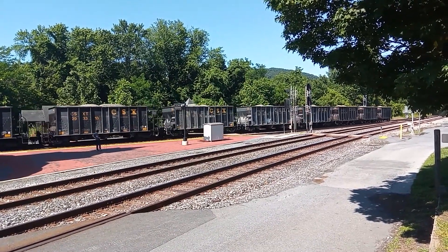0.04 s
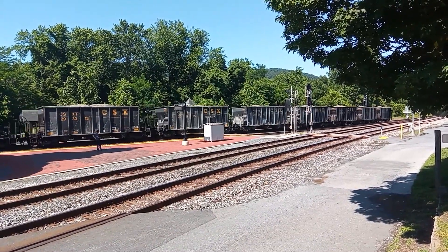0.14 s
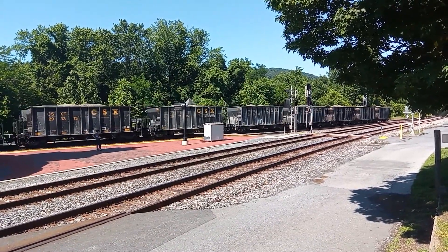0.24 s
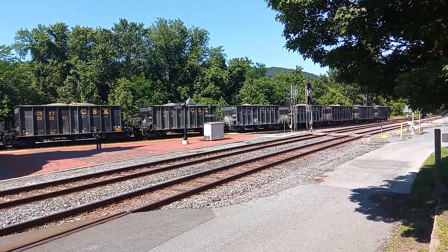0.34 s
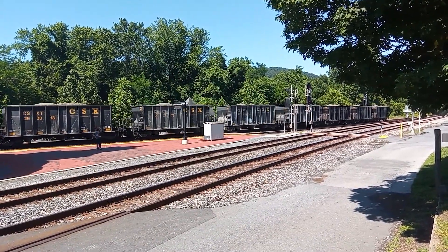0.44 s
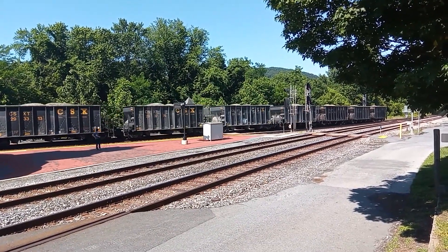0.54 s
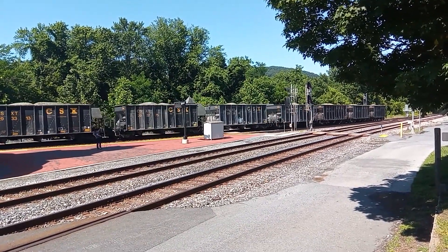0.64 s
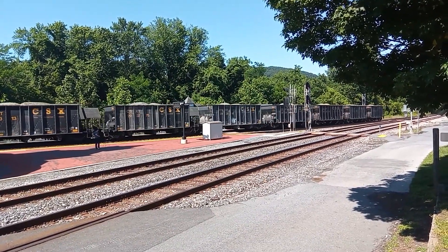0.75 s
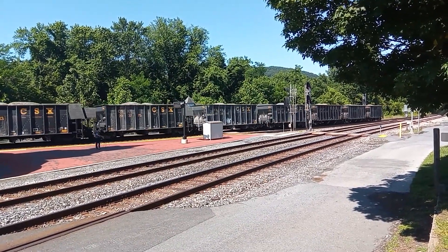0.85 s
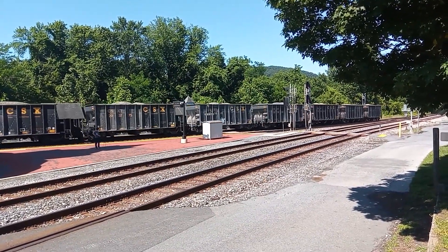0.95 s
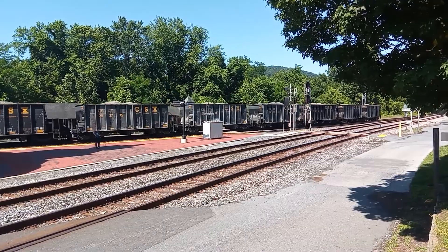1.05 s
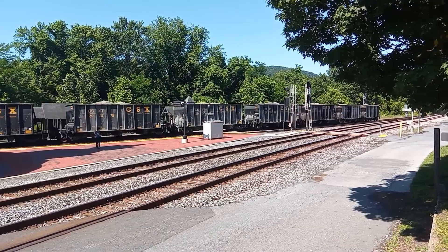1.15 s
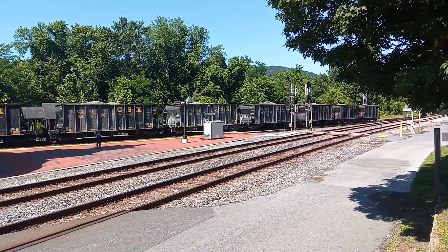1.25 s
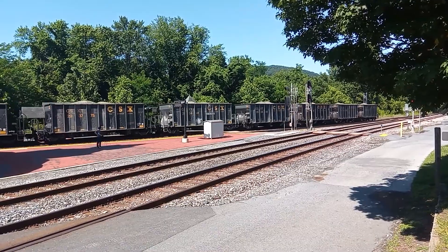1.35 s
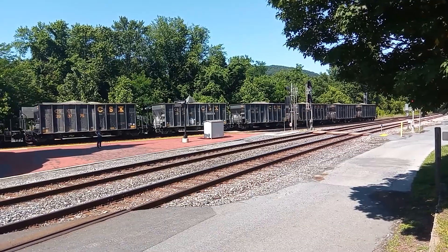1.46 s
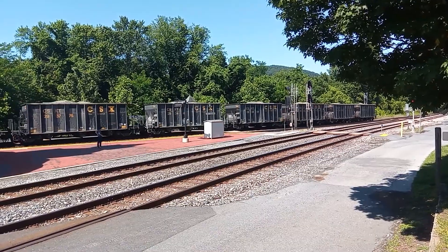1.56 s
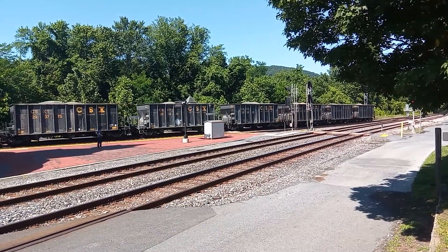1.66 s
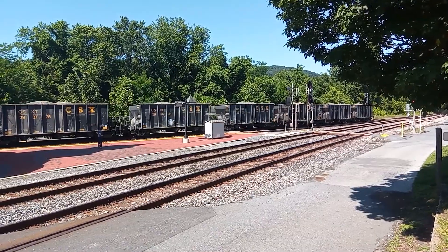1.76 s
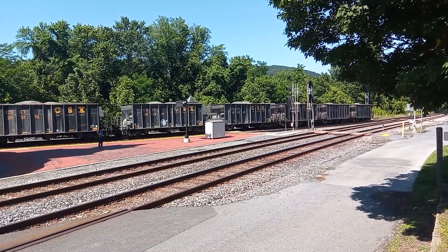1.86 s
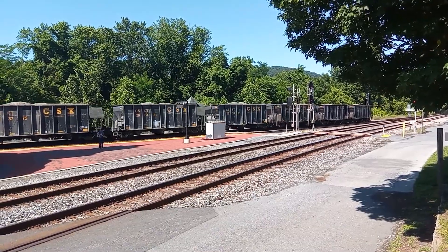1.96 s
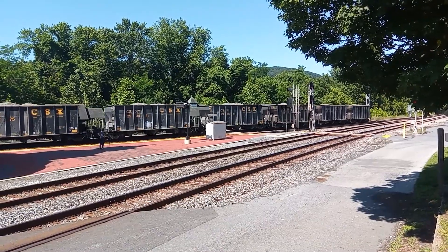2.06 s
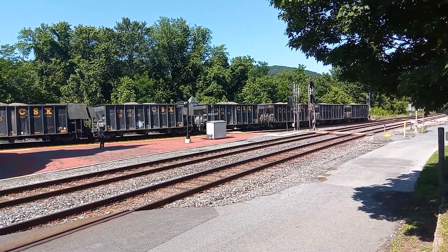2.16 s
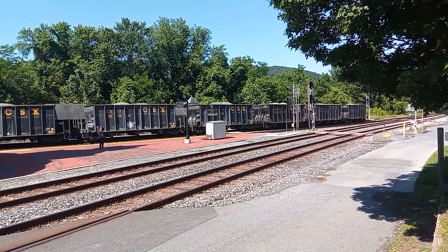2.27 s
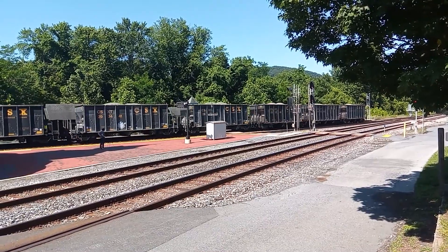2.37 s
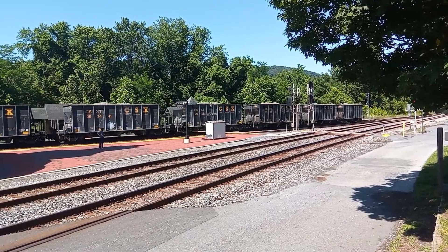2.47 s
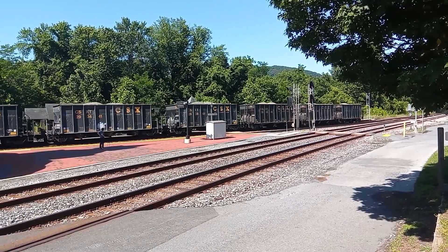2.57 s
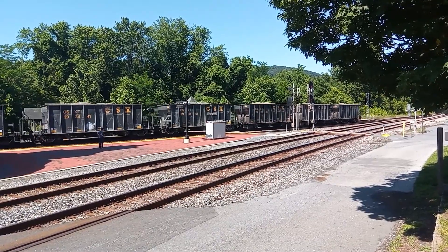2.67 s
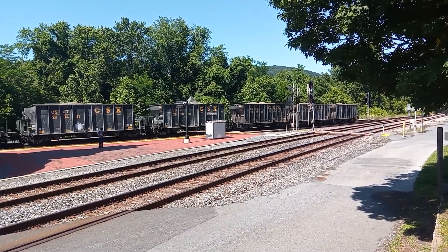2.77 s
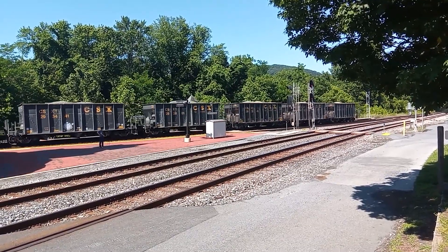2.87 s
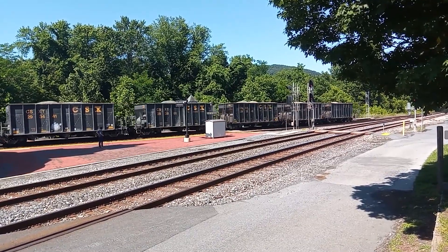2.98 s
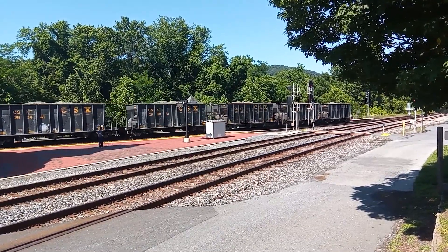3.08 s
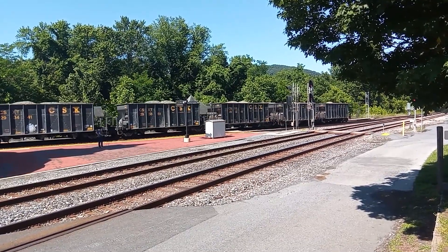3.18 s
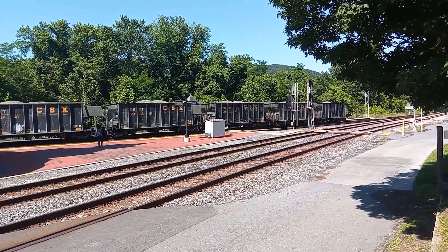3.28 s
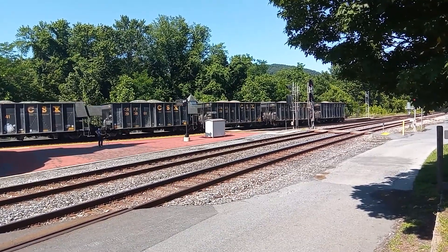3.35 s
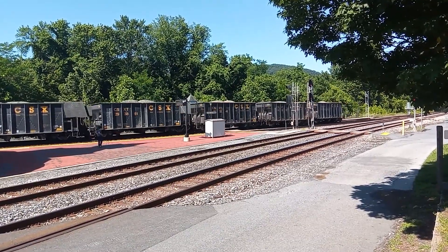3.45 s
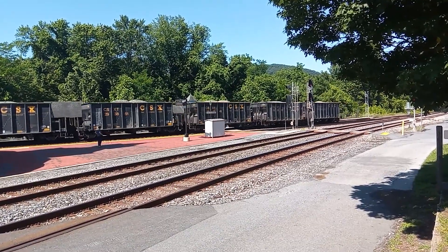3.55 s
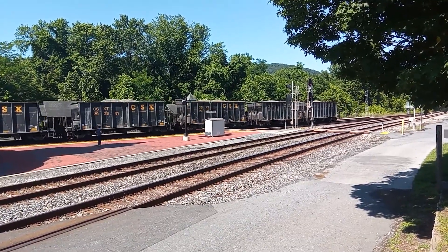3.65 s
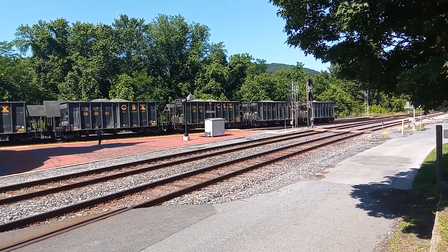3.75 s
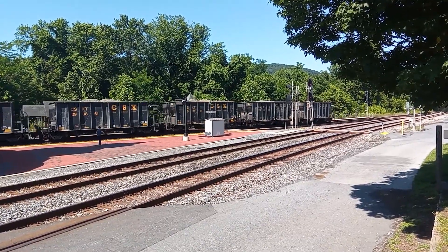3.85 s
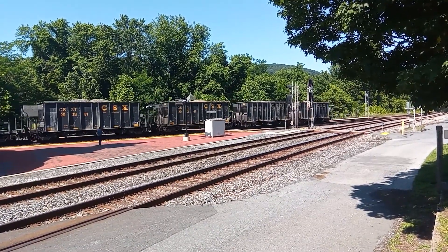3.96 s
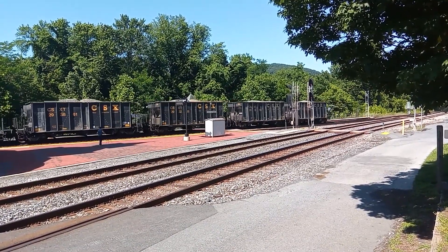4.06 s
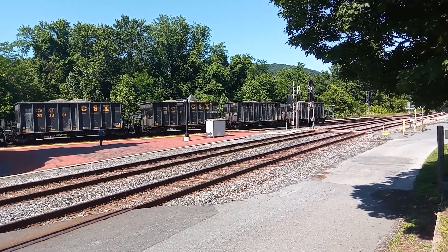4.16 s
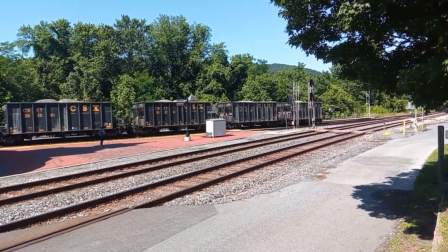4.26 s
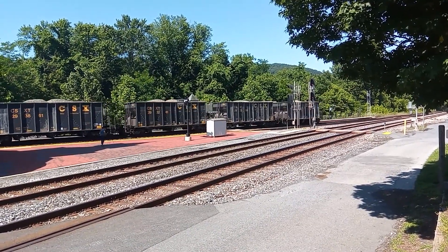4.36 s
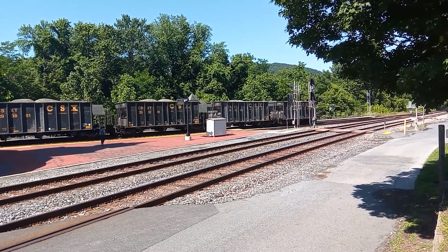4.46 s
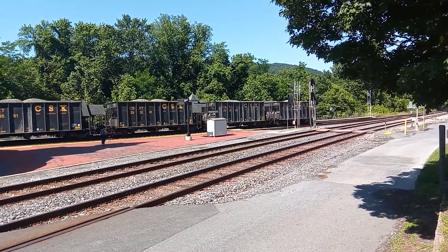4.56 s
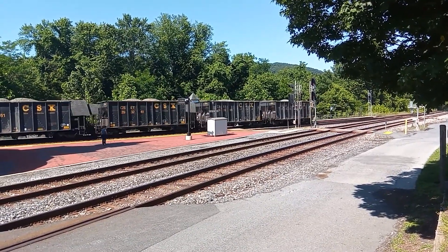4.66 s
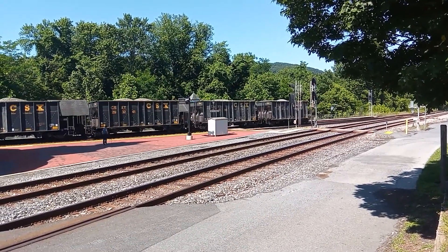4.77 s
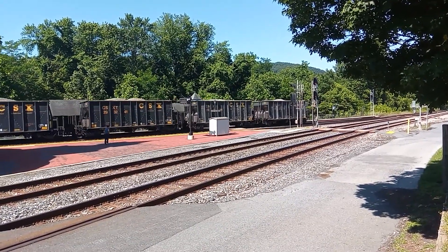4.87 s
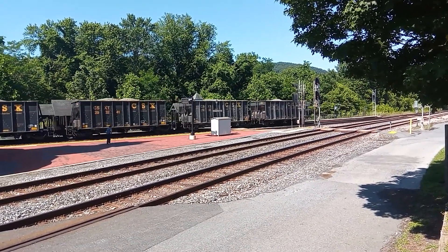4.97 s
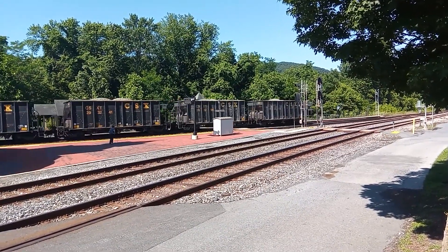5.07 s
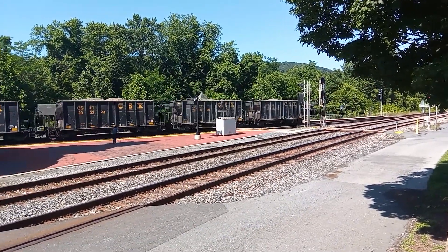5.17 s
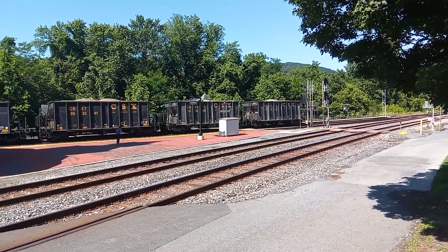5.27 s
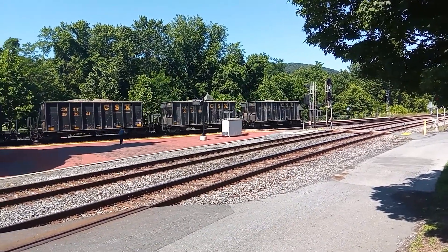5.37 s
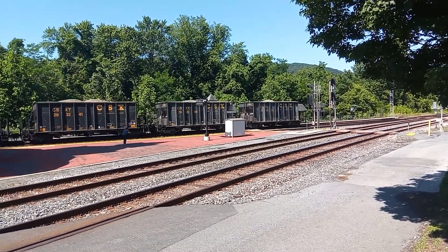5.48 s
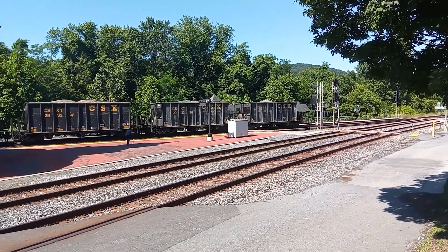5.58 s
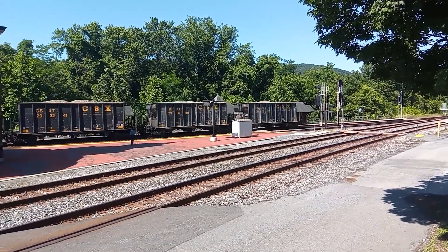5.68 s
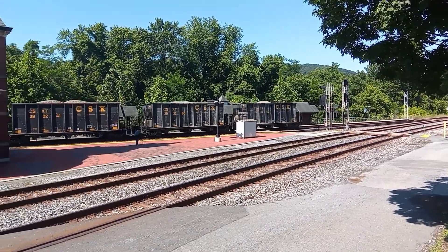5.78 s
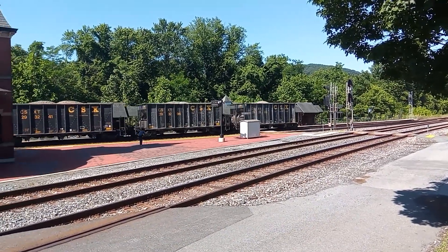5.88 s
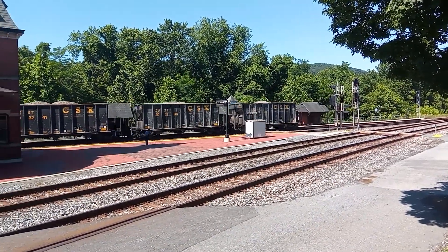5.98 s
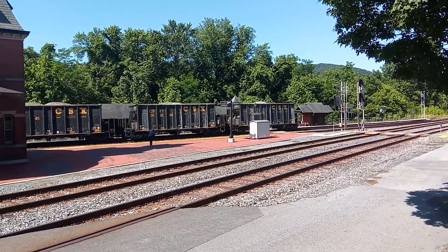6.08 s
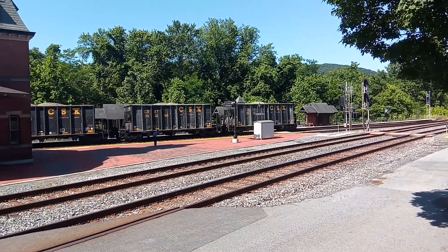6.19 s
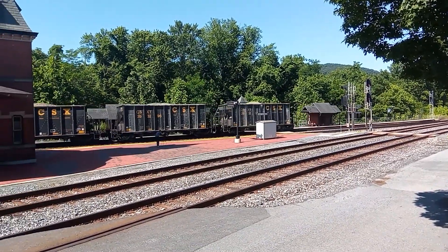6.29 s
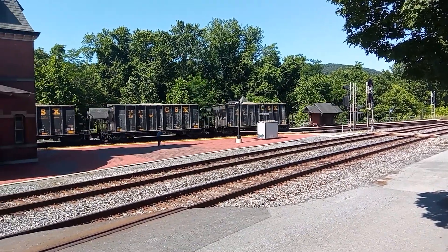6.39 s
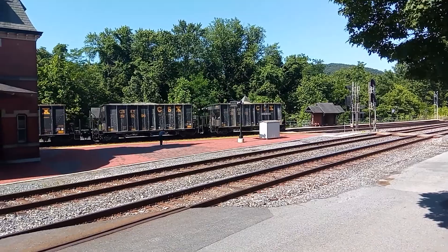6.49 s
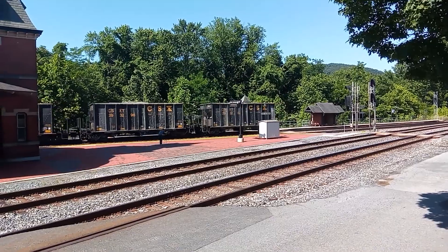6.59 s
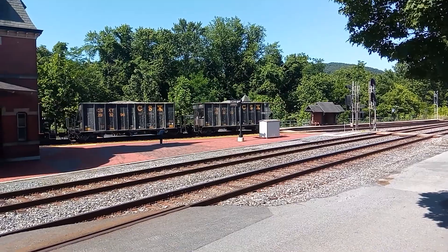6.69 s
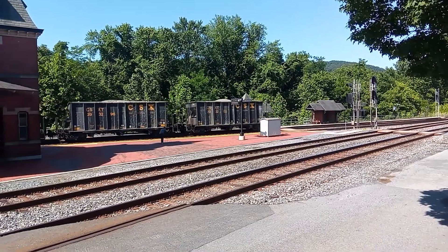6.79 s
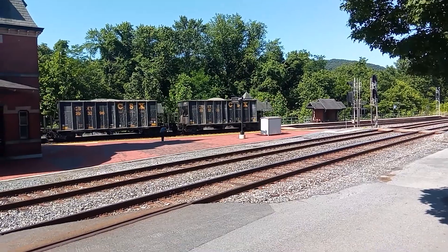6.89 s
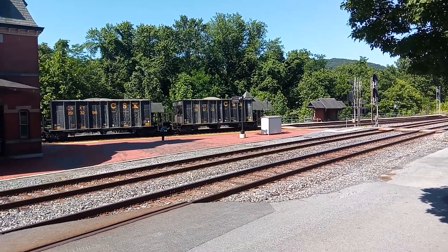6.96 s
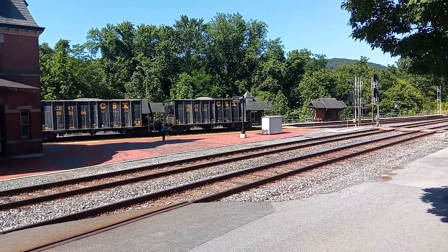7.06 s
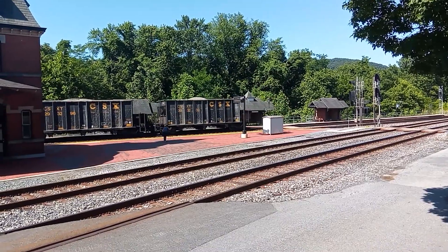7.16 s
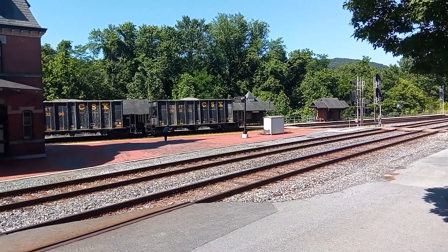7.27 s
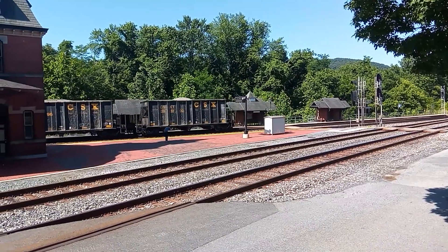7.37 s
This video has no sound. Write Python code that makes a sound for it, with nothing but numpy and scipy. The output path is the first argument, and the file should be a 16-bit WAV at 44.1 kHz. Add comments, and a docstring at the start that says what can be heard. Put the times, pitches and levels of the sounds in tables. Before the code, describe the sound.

A long freight train of loaded hopper cars rolls through a curve, heard outdoors from near the tracks for about seven and a half seconds. From the start, a low rumble runs under harsh, hissing steel grinding and piercing wheel squeals. The squeals are short, stuttering and overlapping, jumping between several high pitches and sinking very slightly; they are strongest in the first four seconds. Rough screeches bite in at about 1, 2.1, 3.5, 4.8 and 6.2 seconds. Wheels knock dully over rail joints at about 2.3, 3.4, 4.9 and 5.3 seconds, then harder at 6.1 and 6.5. One car gives a brief low drone from 3.6 to 4.4 seconds. After about 5.5 seconds the grinding eases and the squeals weaken while the low roar of the cars grows. At about 7 seconds a loose steel part clanks three times quickly as the train keeps rolling.

```python
"""A long train of loaded hopper cars rolls through a curve. From the start, rough treads set the cars
rumbling, flanges grind on the rail, and stick-slip friction locks single wheels into high squeals that
sink slightly in pitch. From about 1 s, flanges bite in rough screeches; from 2.3 s, wheels knock over
rail joints. Midway one car drones briefly. Then the grinding eases as the roar of the bodies grows,
and at about 7 s a loose steel part clanks three times."""
import sys
import numpy as np
from scipy import signal
from scipy.fft import rfft, irfft, next_fast_len
from scipy.io import wavfile

SR = 44100
rng = np.random.default_rng(int(sys.argv[2]) if len(sys.argv) > 2 else 0)


def dump_mix(stems):
    """Bounce the given channels to the path in sys.argv[1] as a 16-bit WAV at rate SR."""
    frames = np.atleast_2d(stems).T  # one column per channel
    limited = np.clip(frames, -1, 1)  # hard clip at full scale
    pcm = np.round(limited * 32767).astype(np.int16)
    wavfile.write(sys.argv[1], SR, pcm)


N = 327663
TIME = np.arange(N) / SR
BINS = np.maximum(np.arange(N // 2 + 1) * SR / N, 1)

# wheel resonances: (frequency [Hz], bandwidth [Hz], lift above the friction noise [dB])
WHEEL_MODES = [(1587, 91, 5.5), (2203, 60, 6), (2722, 73, 5), (3685, 60, 8.5), (3957, 110, 12),
               (4557, 120, 6.5), (5020, 60.6, 2), (5520, 83, 1), (6140, 93, 0.5), (6570, 85, 4.5),
               (7490, 100, 8), (8540, 240, 3.5), (9420, 150, 5), (10530, 220, 7.5), (11580, 190, -2.5),
               (14600, 150, 2), (15250, 250, 2)]
# flange friction: (time [s], level [dB], lift of the keen edge [dB], lift of sizzle and hiss [dB])
FLANGE_FRICTION = [(0, -19.5, -3.5, -1), (1.5, -21.5, -2, -1.5), (3.4, -23.5, 0, 2), (4.3, -23.5, 2.5, 1.5),
                   (5.4, -23.5, 0.5, 0.5), (6.1, -29.5, 2, 2.5), (6.8, -29, -1, 2.5), (7.3, -30.5, 2, -6)]
# ringing of wheels and rails: (time [s], level [dB])
RING_LEVELS = [(0, -25), (.85, -27.5), (1.85, -26), (2.35, -26), (3.45, -29), (4.15, -27), (5.35, -25.5),
               (5.9, -27.5), (7.43, -29.5)]


def from_db(db):
    """Decibels to amplitude ratio."""
    return 10 ** (np.asarray(db) / 20)


def rms_one(x):
    """Normalisation to unit power."""
    return x / np.sqrt(np.mean(x ** 2) + 1e-20)


def gains(rows):
    """Interpolation in decibels: one gain envelope for each level column."""
    times, *columns = np.transpose(rows)
    return [from_db(np.interp(TIME, times, levels)) for levels in columns]


def drift(rate_hz, size=N):
    """Random modulation: noise of unit spread, low-passed at rate_hz."""
    hop, settle = 40, 2000
    pole = np.exp(-2 * np.pi * hop * rate_hz / SR)
    white = rng.standard_normal(N // hop + settle + 2)
    slow = signal.lfilter([1], [1, -2 * pole, pole * pole], white)[settle:]
    return np.interp(np.arange(size) / hop, np.arange(len(slow)), rms_one(slow))


def noise(spectrum, modes=()):
    """Source and filter: unit-power noise with a broad colour and a peak at each resonance."""
    hz, db = np.transpose(spectrum)
    shape_db = np.interp(np.log(BINS), np.log(hz), db, left=-90, right=-90)
    for centre, width, lift in modes:
        shape_db += lift / (1 + (2 * (BINS - centre) / width) ** 2)
    size = next_fast_len(N)
    colour = np.interp(np.arange(size // 2 + 1) * SR / size, BINS, from_db(shape_db))
    return rms_one(irfft(rfft(rng.standard_normal(size)) * colour, size)[:N])


def passing_tone(t, hz, scatter, flutter_hz, beat_hz=27, doppler_per_s=.0088):
    """Doppler effect: a passing mode sinks in pitch, and shifted echoes off the ground and trees beat with it."""
    phase = 2 * np.pi * hz * (t - doppler_per_s * t * t / 2)
    beat = 2 * np.pi * beat_hz * t
    above, below = drift(flutter_hz, len(t)), drift(flutter_hz, len(t))
    echoes = above * np.sin(phase + beat) + below * np.cos(phase - beat)
    return (np.sin(phase) + scatter * echoes) * np.sqrt(2 / (1 + 2 * scatter ** 2))


def add_tone(out, start, length, hz, gain, scatter, flutter_hz, fade_s=0.049):
    """Self-excited oscillation: one mode builds up, holds and dies away, added into out."""
    span = slice(max(int(start * SR), 0), min(int((start + length) * SR), N))
    t = TIME[span] - start
    if len(t):
        fade = np.clip(np.minimum(t, length - t) / fade_s, 0, 1)
        out[span] += np.broadcast_to(gain, N)[span] * fade * passing_tone(t, hz, scatter, flutter_hz)


def squeals(swell_db=0.5, arch_db=3.5, stutter_db=1.7, firm_grip_db=-13):
    """Stick-slip feedback sustains one wheel mode, which swells and stutters until the wheel lets go."""
    # wheels gripping the rail: (start [s], duration [s], starting frequency [Hz], level [dB])
    grips = [(-.1, 0.33, 6670, -17), (-.05, .48, 5560, -19.5), (.36, .35, 5548, -16),
             (0.053, 0.19, 990, -41), (.4, 1.1, 5270, -29), (0.402, 1.3, 5960, -36),
             (.68, .45, 5534, -13.9), (.58, 1.05, 9625, -40.5), (.78, 0.57, 4710, -27.5),
             (1.15, .42, 5530, -17.8), (1.27, .12, 6700, -19), (1.45, .7, 12830, -44),
             (1.53, 0.25, 5500, -15), (1.7, .49, 5490, -15.3), (1.75, .27, 1533, -37.5),
             (2.38, 0.16, 5460, -22), (2.45, 0.4, 4590, -24.5), (2.45, 0.48, 5570, -22.5),
             (2.42, 0.64, 6544, -19), (2.6, 0.37, 1780, -36), (2.62, 0.23, 3590, -31),
             (2.94, 0.18, 5550, -14.5), (2.98, .4, 6060, -30), (3.11, 0.48, 6535, -18.5),
             (3.13, 0.3, 5540, -22), (3.45, 0.16, 6525, -12.5), (3.66, 0.26, 6510, -18),
             (3.8, 0.24, 7480, -22), (4.0, 0.68, 6495, -23), (4.0, .9, 7460, -25.5),
             (4.05, .41, 2200, -33.5), (4.44, .15, 8790, -39), (5.02, .21, 11548, -40),
             (5.25, .39, 1560, -36), (5.27, 0.27, 15150, -29), (5.42, 0.14, 6450, -23),
             (5.86, 0.14, 6410, -22.5), (6.19, .14, 4620, -28), (6.2, 0.27, 5460, -27),
             (6.44, .12, 6430, -24.5), (6.56, .28, 5500, -26)]
    out = np.zeros(N)
    for start, length, hz, db in grips:
        from_middle = np.clip((TIME - start) / length, 0, 1) - .5
        shape_db = swell_db * from_middle + arch_db * (1 / 3 - (2 * from_middle) ** 2)
        gain = from_db(db + shape_db + stutter_db * drift(11))
        scatter = .25 + .01 * max(firm_grip_db - db, 0)   # a firm grip rings clean; weaker ones rasp
        add_tone(out, start, length, hz, gain, scatter, flutter_hz=.0035 * hz)
    return out


def grinding():
    """Sliding friction: flanges stick and slip on the rail, exciting four bands that judder together."""
    # friction spectra, lowest band first: (frequency [Hz], relative density [dB])
    grind_band = [(2500, -38), (3100, -21), (3700, -8.5), (3900, -9.5), (4200, -7.5), (4550, -1),
                  (4900, -4), (5300, 2), (5700, 7.5), (5950, -6), (6200, -13), (6800, -30)]
    edge_band = [(5600, -17), (6100, -5), (6450, 4.5), (6700, 0.5), (6900, -1), (7150, -10), (7400, -7.5),
                 (7600, -10.5), (7800, -14.5), (8100, -40), (9000, -48)]
    sizzle_band = [(7000, -14), (8100, -5), (8550, 5), (9000, -1.5), (11000, 1), (13900, 3), (14600, -11)]
    hiss_band = [(13700, -20), (14400, -1), (15400, -1), (15700, -7)]
    grind, keen, bright = gains(FLANGE_FRICTION)
    judder_db = 0.56 * drift(21)
    out = grind * from_db(1 + judder_db + 0.85 * drift(9.8)) * noise(grind_band, WHEEL_MODES)
    out += grind * keen * from_db(2.5 + judder_db + 0.86 * drift(6)) * noise(edge_band, WHEEL_MODES)
    sizzle = grind * bright
    hiss = sizzle ** 0.49   # about half the sizzle's swing in decibels
    out += hiss * from_db(-24 + judder_db + drift(14)) * noise(hiss_band)
    return out + sizzle * from_db(-15 + judder_db + 1.1 * drift(13)) * noise(sizzle_band, WHEEL_MODES)


def rolling():
    """Forced vibration: rough treads shake the loaded bodies and ring wheels and rails."""
    # shaking of the car bodies: (time [s], level [dB])
    shake_levels = [(0, -36), (1.0, -38.5), (2.4, -33), (3.9, -35.5), (5.1, -32), (5.9, -28), (7.05, -27),
                    (7.43, -30)]
    # deep rumble, body roar, wheel and rail ring: (frequency [Hz], relative density [dB])
    rumble_band = [(20, -11), (40, -15), (53, -12), (66, -0.5), (82, 3.5), (100, 6.5), (120, -5),
                   (170, -50)]
    roar_band = [(80, -28), (125, -2.5), (165, -2.5), (220, -.5), (280, -8), (345, -6.5), (430, -17.5),
                 (560, -11), (720, -10), (880, -17.5), (1200, -15.5), (2500, -29)]
    ring_band = [(780, -11.5), (900, -11), (990, -5.5), (1170, -17), (1350, -6), (1500, -2), (1750, -2.5),
                 (1950, -1.5), (2300, -1), (2550, -5.5), (2950, -7.5), (3500, -2.5)]
    shake, = gains(shake_levels)
    ring, = gains(RING_LEVELS)
    out = shake ** 0.52 * from_db(-17.5) * noise(rumble_band)   # about half the roar's swing in decibels
    out += shake * from_db(1.66 + 1.44 * drift(5.9)) * noise(roar_band)
    out += ring * from_db(1.1 * drift(10)) * noise(ring_band, WHEEL_MODES)
    # one car drones briefly
    add_tone(out, start=3.6, length=.82, hz=100, gain=from_db(-33.5), scatter=0.18, flutter_hz=4.7)
    return out


def scrapes(rough_db=2.5, fade_s=0.038):
    """Friction chatter: a biting flange drives the wheel's middle modes without settling on one."""
    # flange bites: (start [s], duration [s], level [dB])
    bites = [(.95, .42, -27), (2.122, 0.58, -26.5), (3.546, 0.61, -27.5), (4.84, 0.33, -27),
             (6.185, 0.19, -25), (6.406, 0.33, -25.5)]
    # screech spectrum: (frequency [Hz], relative density [dB])
    screech_band = [(2900, -21), (3600, -9.5), (4200, -7), (4600, 0), (5100, -4), (5700, -9), (7000, -30)]
    envelope = np.zeros(N)
    for start, length, db in bites:
        envelope += from_db(db) * np.clip(np.minimum(TIME - start, start + length - TIME) / fade_s, 0, 1)
    return envelope * from_db(rough_db * drift(25)) * noise(screech_band, WHEEL_MODES)


def rail_joints(rise_s=0.007, t60_s=0.34):
    """Impact excitation: each drop of a wheel at a joint booms through the hopper above it."""
    # wheel drops: (time [s], relative level [dB])
    drops = [(2.336, -18), (3.407, -18.5), (4.854, -21), (5.309, -20), (6.116, -13.5), (6.46, -13.5),
             (6.55, -20)]
    # response of the hopper: (frequency [Hz], relative density [dB])
    knock_band = [(60, 0), (130, 8), (300, 5.5), (450, -2.5), (700, 1.5), (1200, -13), (2500, -27),
                  (6000, -45)]
    envelope = np.zeros(N)
    for start, db in drops:
        age = np.maximum(TIME - start, 0)
        decay_db = 60 * np.minimum(age / t60_s, 2)
        envelope += from_db(db - 8 - decay_db) * (1 - np.exp(-age / rise_s))
    return envelope * noise(knock_band)


def clanks(spread_db=2):
    """Damped free vibration: each blow rings every mode of a loose steel part with a random strength."""
    # blows on the part: (time [s], level [dB])
    blows = [(7.035, -32), (7.095, -23), (7.178, -23)]
    # its modes: (frequency [Hz], relative level [dB], time to fall 60 dB [s])
    steel_modes = [(590, -7, .15), (677, -3, 0.16), (728, 0.5, 0.18), (745, -2, 0.16), (1310, -8, 0.23)]
    out = np.zeros(N)
    for start, db in blows:
        onset = int(start * SR)
        age = TIME[onset:] - start
        for hz, mode_db, t60_s in steel_modes:
            envelope = from_db(db + mode_db + rng.normal(0, spread_db) - 60 * age / t60_s)
            out[onset:] += envelope * np.sin(2 * np.pi * hz * age)
    return out


def far_wheels(count=420, tuning_spread=.05, range_db=8, shortest_s=.08):
    """Incoherent sum: the other wheels sing faintly at random, each detuned and blurred by echoes."""
    # strongest singing of low, middle and high modes: (level relative to the drive [dB])
    strongest_db = [-12.5, -7.5, -22]
    # longest singing of the same groups: (duration [s])
    longest_s = [.25, .28, .6]
    out = np.zeros(N)
    ring, = gains(RING_LEVELS)
    grind, _, bright = gains(FLANGE_FRICTION)
    drives = [ring, grind, grind * bright]
    for when, hold, which, detune, weakness in rng.random((count, 5)):
        hz, width, _ = WHEEL_MODES[int(which * len(WHEEL_MODES))]
        hz += min(tuning_spread * hz, 2 * width) * (detune - .5)
        group = np.searchsorted([3800, 7000], hz)
        gain = drives[group][int(when * N)] * from_db(strongest_db[group] - range_db * weakness)
        length = shortest_s + hold * (longest_s[group] - shortest_s)
        add_tone(out, when * TIME[-1] - length / 2, length, hz, gain, scatter=0.56, flutter_hz=.004 * hz)
    return out


def scene():
    """Superposition: the whole train is heard from one direction, alike in both ears."""
    train = rolling() + grinding() + scrapes() + squeals() + far_wheels() + rail_joints() + clanks()
    return np.array([train, train])


def record(dry, ceiling=0.7, cutoff_hz=15580):
    """Soft saturation rounds the highest peaks; a steep low-pass filter limits the bandwidth."""
    rounded = dry / (1 + (dry / ceiling) ** 6) ** (1 / 6)
    return signal.sosfilt(signal.ellip(12, .1, 90, cutoff_hz, fs=SR, output="sos"), rounded)


dry = scene()
out = record(dry)
dump_mix(out)
```